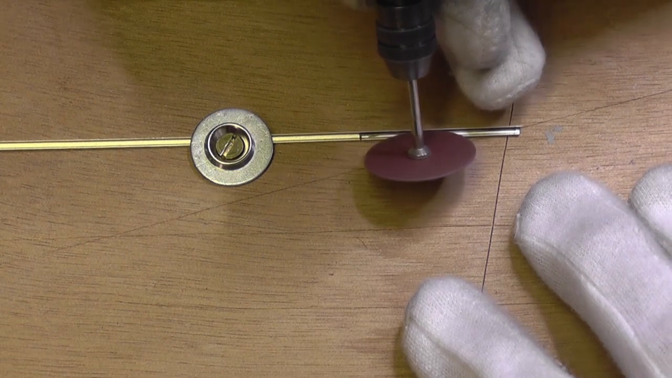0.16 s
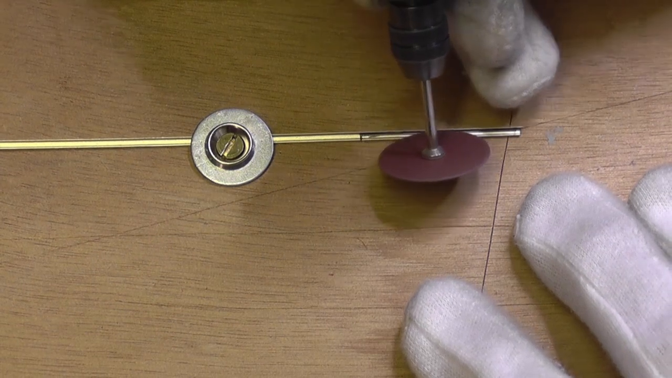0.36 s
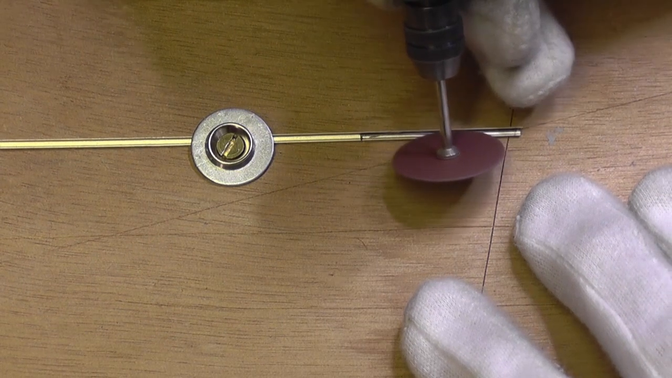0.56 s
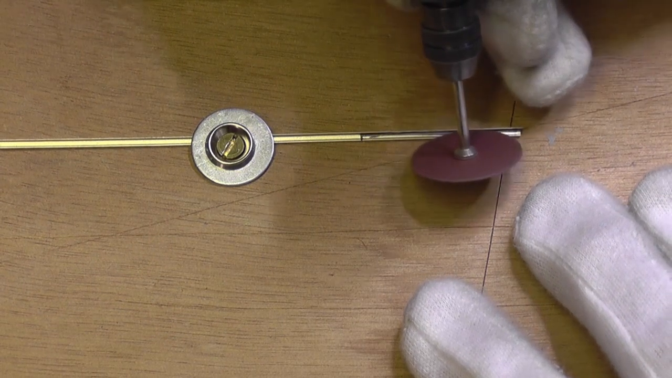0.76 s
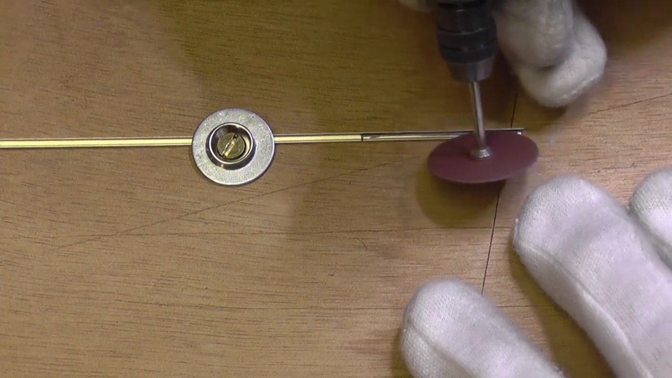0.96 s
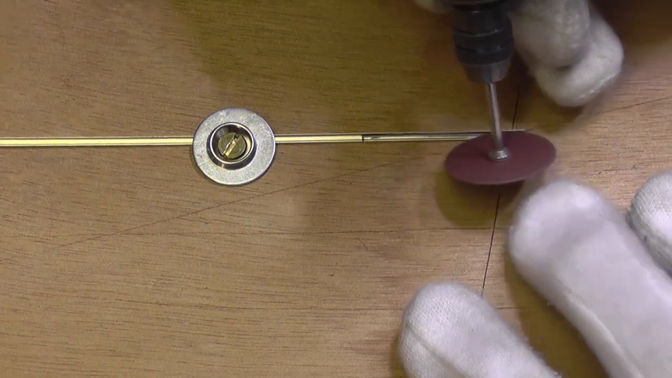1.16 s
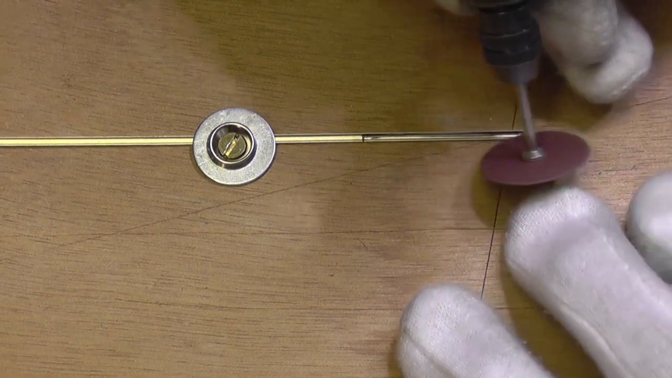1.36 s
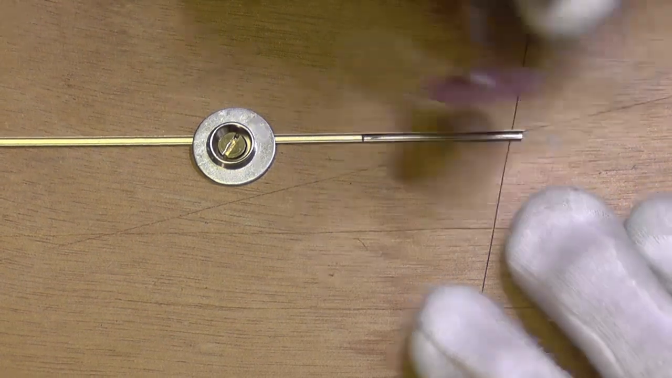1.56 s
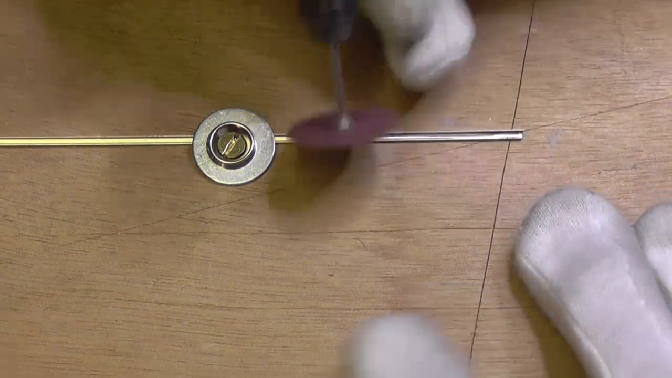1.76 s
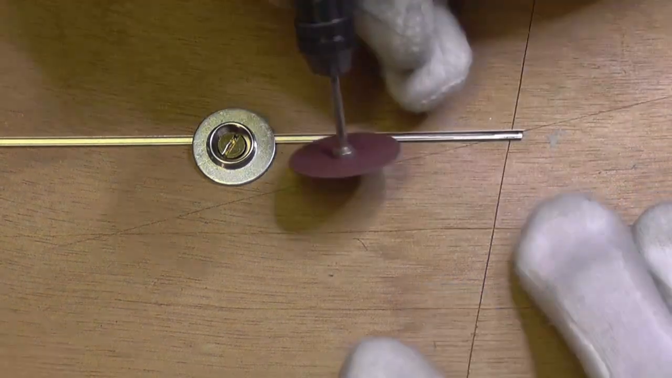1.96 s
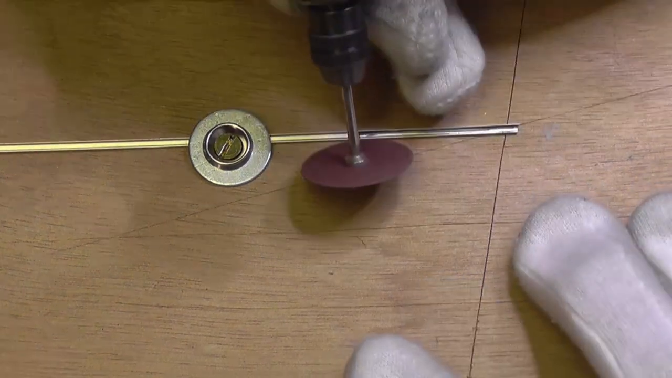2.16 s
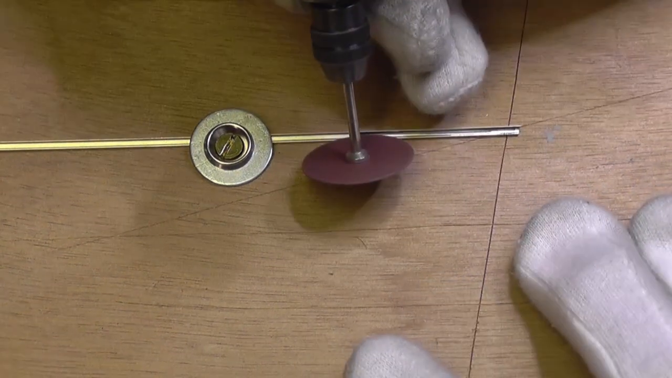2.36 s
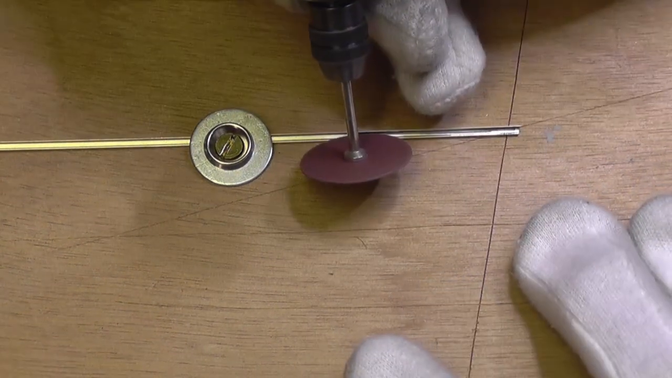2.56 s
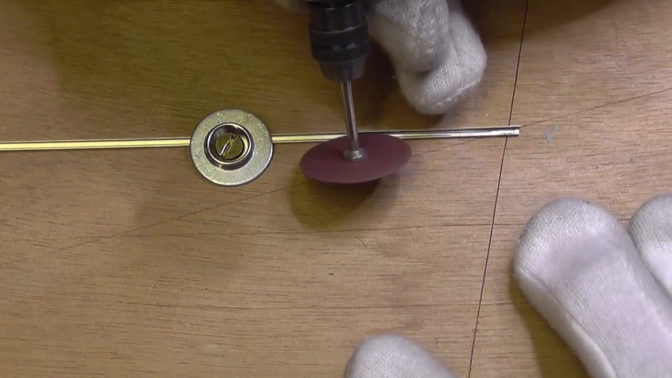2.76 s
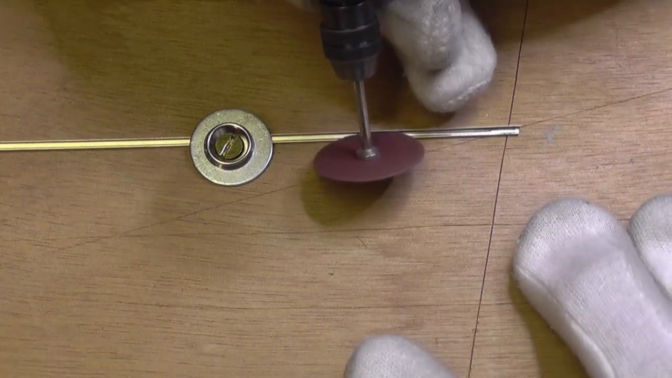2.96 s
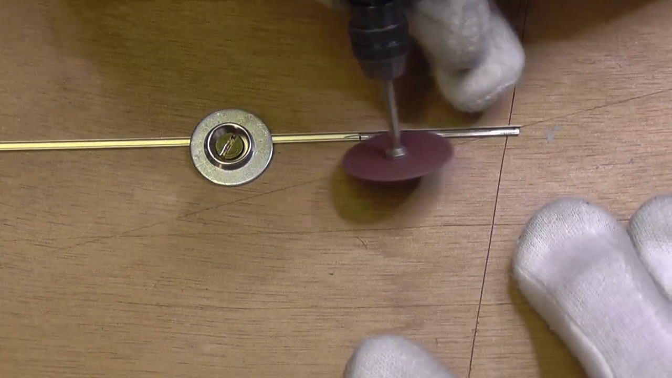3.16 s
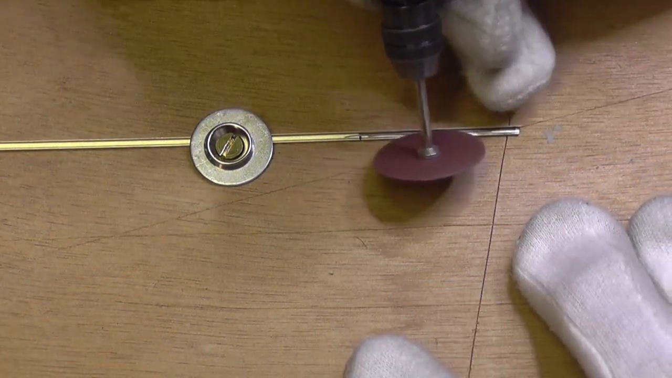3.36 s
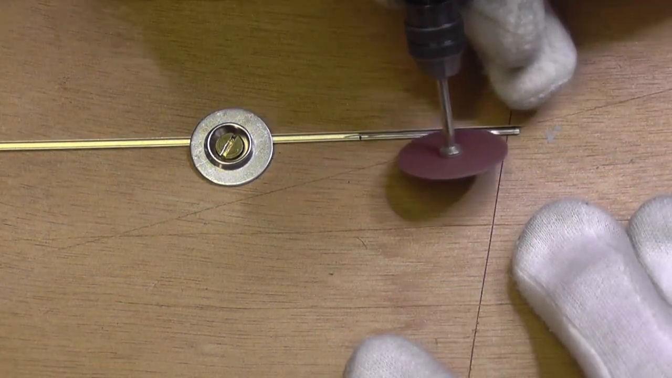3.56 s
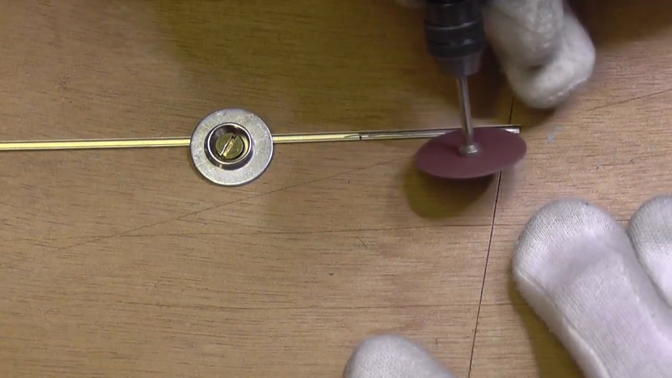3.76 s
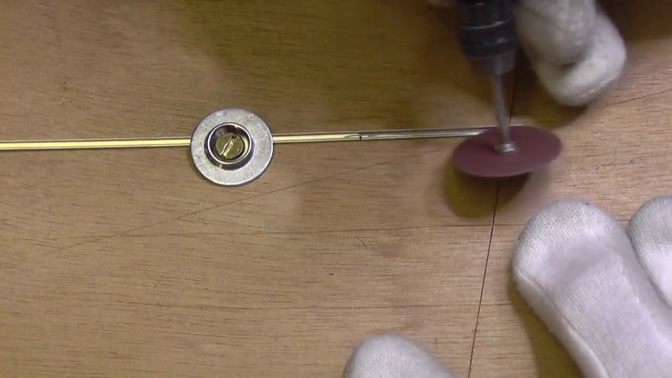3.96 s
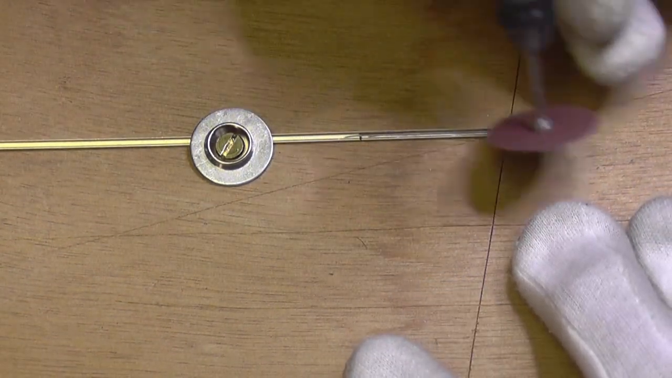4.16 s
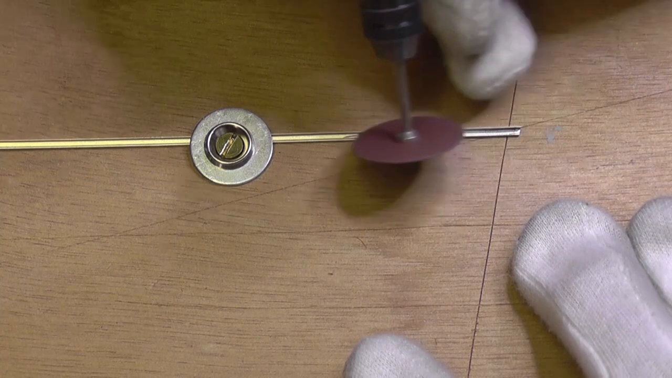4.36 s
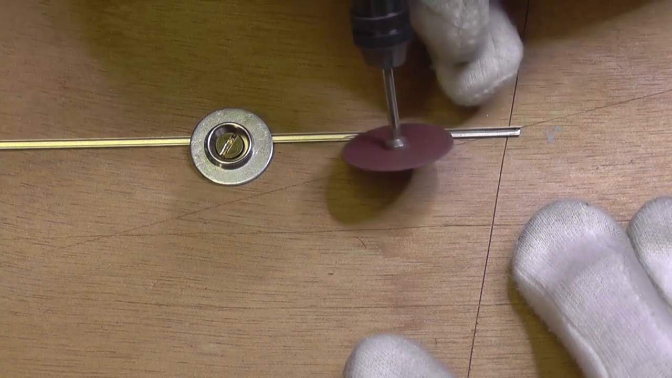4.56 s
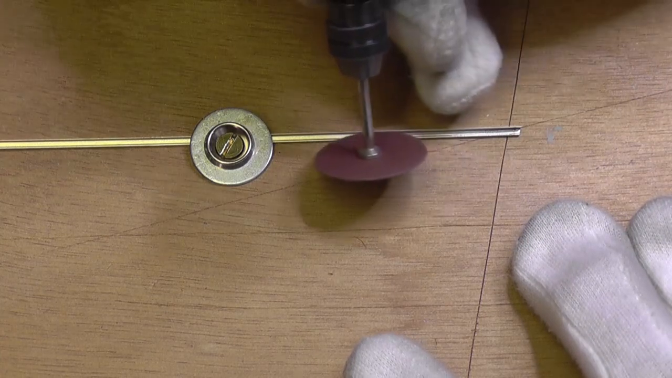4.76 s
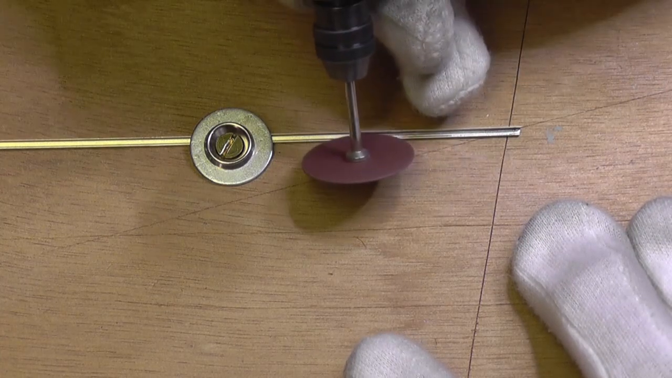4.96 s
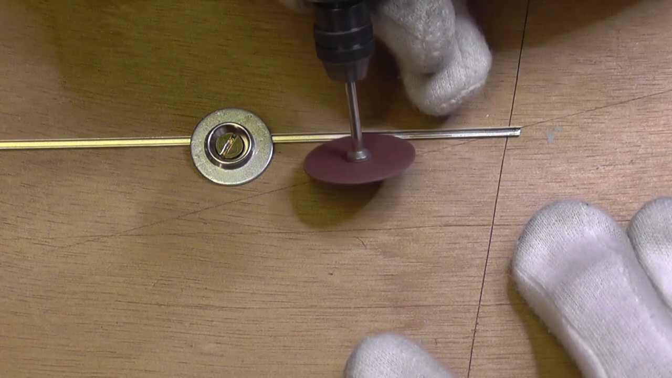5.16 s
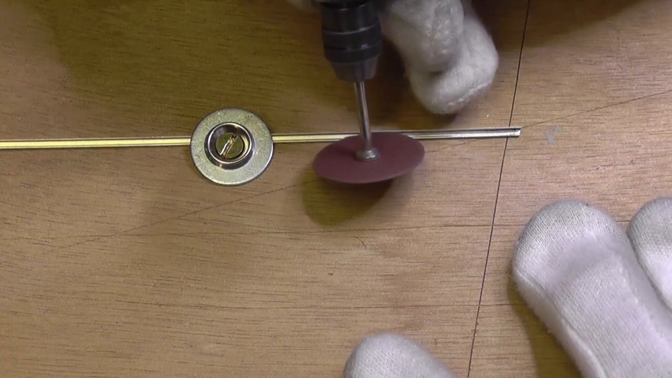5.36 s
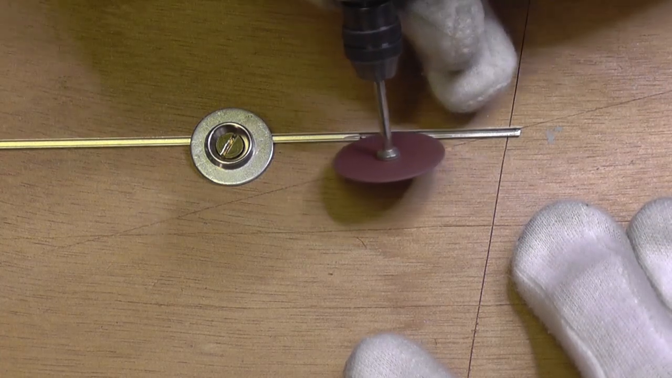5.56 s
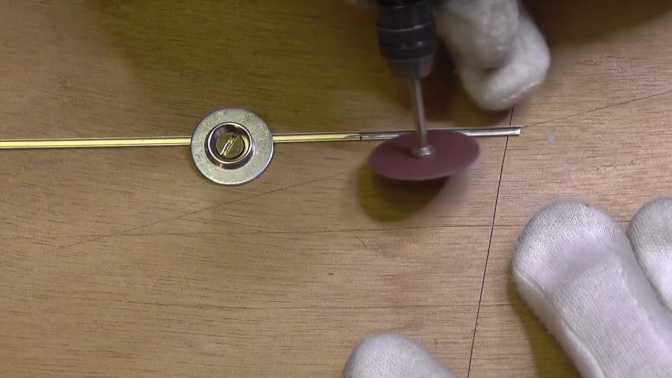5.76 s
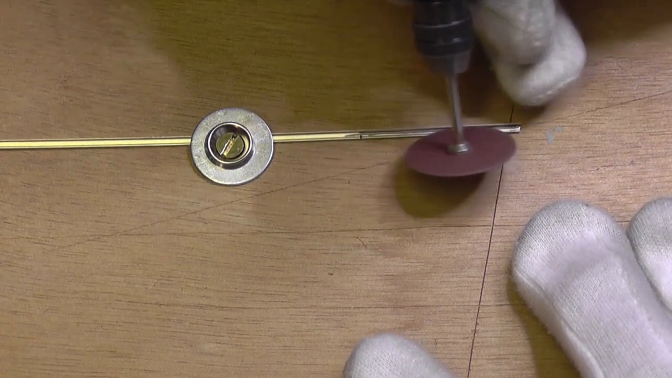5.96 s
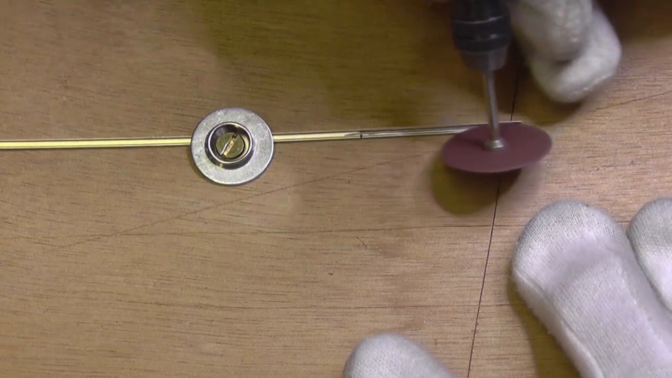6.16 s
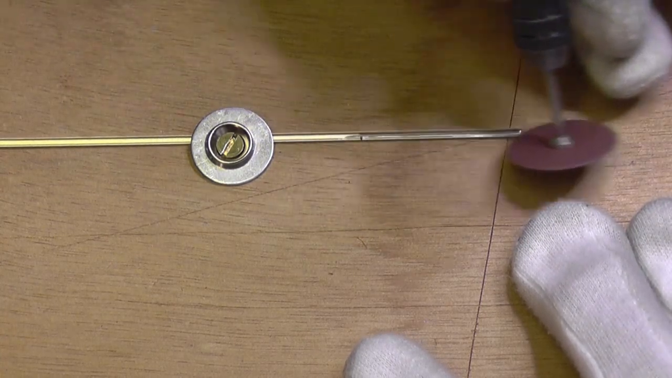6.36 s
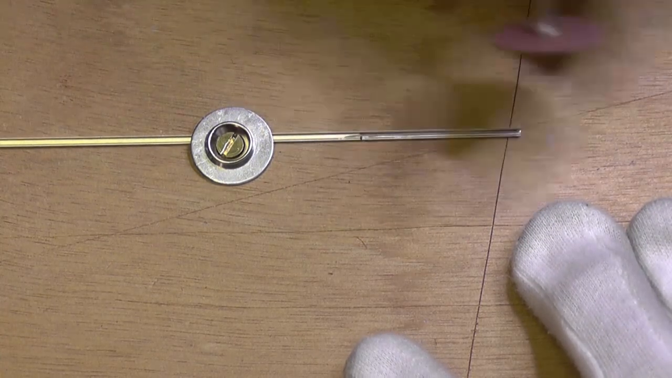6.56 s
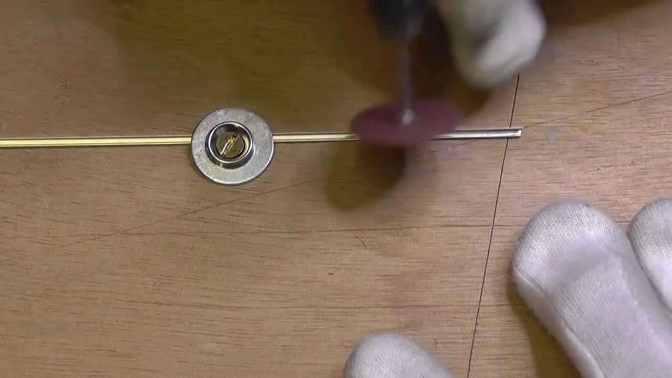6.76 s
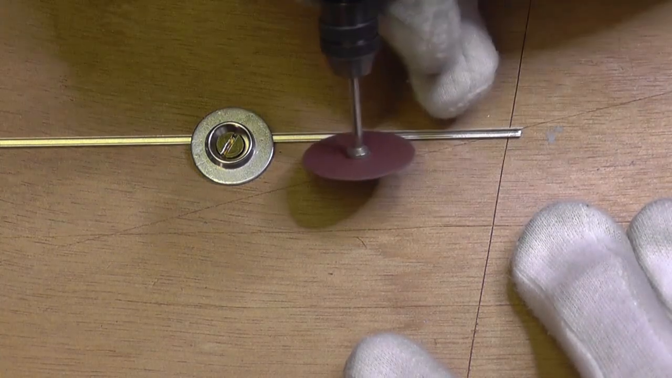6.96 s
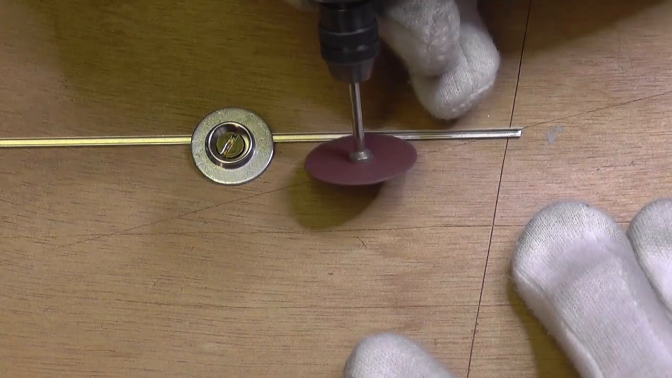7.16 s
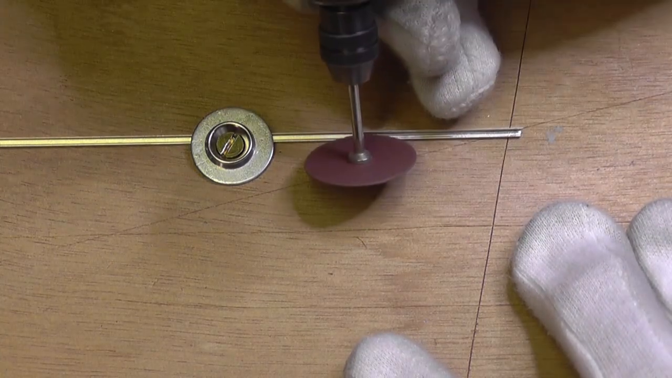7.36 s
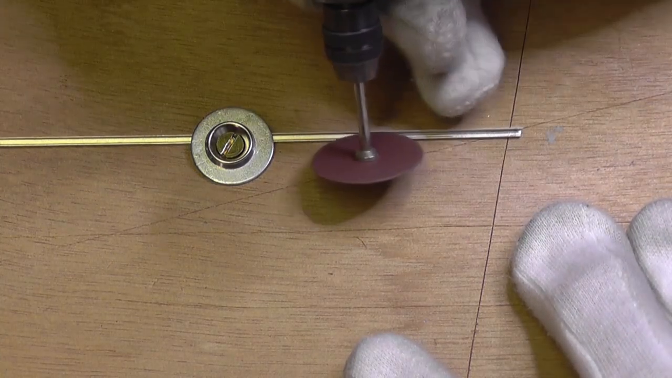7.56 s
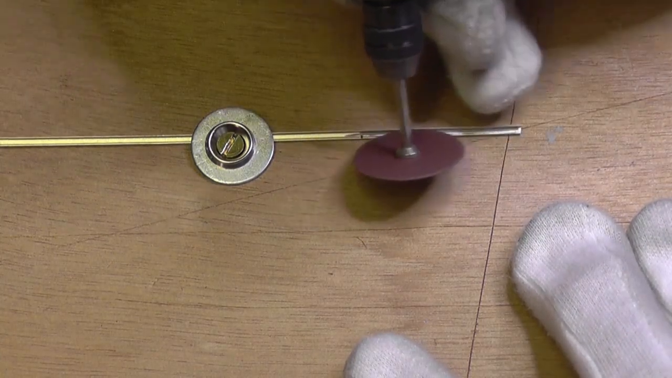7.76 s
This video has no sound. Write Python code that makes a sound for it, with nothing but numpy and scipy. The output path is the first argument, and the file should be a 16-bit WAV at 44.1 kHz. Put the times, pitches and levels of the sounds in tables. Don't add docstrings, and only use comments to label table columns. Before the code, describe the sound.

A small electric rotary tool is heard close up at a wooden bench in a dry workshop. From 0 to 1.4 seconds its disc is already grinding thin metal, a bright gritty rasp with fluttering metallic tones, while a hand rubs and lightly knocks the bench until about 0.7. The disc lifts; the pitch jumps up and the motor whines alone, much quieter, gradually swelling, with soft knocks. At 2.7 a hard, sharp touch-down starts a longer grind, its pitch sinking to a labouring, growling hum around 3.7 before release at 4.1. The free whine returns. A third pass from 5.2 to 6.4 again hisses, rings and bogs down. Whining resumes with a few bench thumps near 6.5. At 7.4 the disc bounces briefly, then bites again at 7.45, slowing and roughening until the cut-off at 7.8.

```python
import sys
import numpy as np
from scipy import signal
from scipy.fft import rfft, irfft
from scipy.io import wavfile
from scipy.ndimage import uniform_filter1d, map_coordinates

SR = 44100
rng = np.random.default_rng(int(sys.argv[2]) if len(sys.argv) > 2 else 0)


def transcribe(signal):
    frames = np.atleast_2d(signal).T
    limited = np.clip(frames, -1, 1)
    pcm = np.round(limited * 32767).astype(np.int16)
    wavfile.write(sys.argv[1], SR, pcm)


def natural_amplitude(level_db):
    exponent = np.asarray(level_db, float) / 20
    return 10 ** exponent


N = 344421

# f/Hz, density/dB per Hz
WORKSHOP = [(15, -47), (25, -13), (167, -10), (194, -19), (233, -6), (295, -6), (700, -13), (910, -42),
            (1540, -120)]
WORKSHOP_DB = -70.5
# f/Hz, level/dB
MAINS = [(100, -67.5), (200, -68), (300, -64.5)]
# t/s, level/dB
RUBBING = [
    (0, -50),
    (.4, -48.5),
    (.62, -57.5),
    (.7, -65),
    (7.81, -65),
]
# t/s, peak level/dB, f/Hz, share in opposite phase at the ports/1
KNOCKS = [(.009, -44, 554, 0.071), (0.073, -55, 263, 1), (.084, -53, 297, .9), (.17, -56, 400, 0.92),
          (0.194, -52, 330, 0.94), (0.297, -58.5, 430, 0.8), (.378, -55, 454, .8), (0.388, -49, 490, 0.75),
          (1.619, -55, 302, -0.18), (1.673, -59, 190, 0), (1.74, -56, 170, 0.018), (1.859, -49, 169, -0.11),
          (2.144, -55, 260, 0.43), (2.656, -42, 480, 0.64), (2.656, -42, 190, 0.46),
          (5.225, -50.5, 398, 0.97), (6.459, -45, 487, -0.11), (6.461, -48.5, 750, 0.0098),
          (6.646, -55.5, 195, -0.14), (6.669, -57, 200, -0.19), (7.382, -49, 293, 1),
          (7.452, -65, 605, 0.56)]

# multiple of shaft speed/1, level/dB
WHINE = [(4, -13), (5, 0), (6, -2), (7, -14), (8, -9), (9, -10), (10, -10), (13, -13.5), (14, -14),
         (15, -5), (17, -13), (19, -14), (20, -17), (22, -16), (23, -10), (25, -13), (26, -14), (27, -16),
         (31, -19), (32, -16), (33, -14), (34, -10), (35, -9), (36, -6), (37, -10), (38, -16), (39, -11),
         (40, -17), (42, -15), (43, -19), (44, -9)]
WHINE_DB, FAINT_DB, TOP_MULTIPLE = -42, -26, 46
COMMUTATOR = (10, 15)
# multiple of shaft speed/1, level/dB
BETWEEN_MULTIPLES = [(5.49, -11), (6.71, -10), (7.7, -16)]
# f/Hz, density/dB per Hz
BRUSHES = [(290, -44), (500, -21), (906, -9), (1030, -2.5), (1480, -10), (1870, -9), (2230, -11),
           (2980, -9.5), (3250, -16.5), (5970, -21), (7310, -22.5), (10500, -33.5), (12700, -35.5),
           (15300, -24.5), (16000, -53)]
BRUSHES_DB = -47
# f/Hz, width/Hz, level/dB
HOUSING = [(1140, 350, 5.5), (2670, 280, -39.5), (7440, 940, 14), (10100, 430, -25), (10320, 1140, 21.5)]
# f/Hz, width/Hz, change/dB
VENT_SHADOWS = [(5950, 400, -9), (2270, 150, -5), (3650, 200, -4), (9450, 300, -4)]

# touch-down t/s, lift t/s, free speed afterwards/turns per s
PASSES = [
    (0, 1.365, 202.7),
    (2.654, 4.08, 205.7),
    (5.225, 6.367, 205.9),
    (7.376, 7.395, 203),
    (7.45, 7.81, 205),
]
# t/s, speed/turns per s
LOADED_SPEED = [
    [(0, 184.6), (.098, 183.9), (.136, 178.6), (.294, 184.5), (.416, 185.2), (.636, 174.3), (.802, 171.2),
     (.908, 179.3), (1.056, 175.1), (1.128, 169.6), (1.196, 170.1), (1.26, 175.2), (1.322, 172.8),
     (1.36, 178)],
    [(2.752, 194.8), (2.792, 184.6), (2.846, 181.4), (3.05, 141.2), (3.094, 143.4), (3.21, 138.7),
     (3.268, 144), (3.442, 117.3), (3.538, 109.4), (3.62, 106.5), (3.694, 96.8), (3.76, 101.5),
     (3.822, 97.5), (3.876, 105.2), (3.948, 110), (4.07, 132)],
    [(5.324, 186.2), (5.382, 186.8), (5.496, 174.6), (5.59, 157.4), (5.626, 153.3), (5.692, 140.3),
     (5.794, 137.3), (5.92, 119.3), (6.022, 112.8), (6.074, 106.7), (6.134, 109.1), (6.222, 102.7),
     (6.244, 103.1), (6.36, 128)],
    [(7.46, 200), (7.56, 183.6), (7.68, 173.5), (7.74, 155.8), (7.81, 144.6)],
]
DROOP = [-.2, 2.2, 1.0]
SPIN_UP_S = .08
JUDDER, IDLE_JUDDER = .6, .15
# t/s, lasting/s, multiple of shaft speed/1, level/dB
SHAKES = [(0.84, 0.42, 1, -60), (3.46, 0.13, 1, -58), (3, 0.051, 1, -62), (3.98, 0.06, 1, -60),
          (5.5, 0.17, 1, -60), (3.05, 0.19, 3, -51), (3.07, 0.14, 5, -52), (5.55, 0.16, 3, -52),
          (7.68, 0.12, 3, -50.5), (.2, 0.2, 4, -62), (3.8, .14, 5, -55), (5.55, .09, 4, -52),
          (5.7, .08, 5, -52), (3.5, .12, 7, -59), (3.72, .15, 9, -56), (6.0, .12, 9, -51),
          (3.5, .12, 11, -46), (5.82, .1, 9, -47), (3.17, .12, 9, -46), (7.7, .1, 5, -52),
          (3.0, .1, 6, -54), (6.15, .1, 8, -55), (3.1, .15, 10, -42), (3.45, .12, 12, -42),
          (3.75, .12, 14, -43), (2.82, .1, 9, -42), (5.65, .12, 10, -43), (6.1, .12, 13, -44)]

# t/s, force as level/dB, flexing of the rail/dB
HAND = [
    [(0.0, -30.5, 2.5), (0.088, -24, -9), (0.95, -22.5, -21), (0.97, -20, -29.5), (1.19, -22.5, -23.5),
     (1.294, -23.5, -27), (1.34, -24, -19.5)],
    [(2.7, -26, -16.5), (2.766, -24, -23), (2.94, -23, -12.5), (3.564, -21.5, -12.5), (3.696, -23, -5.5),
     (4.034, -20.5, -14.5), (4.05, -24.5, -14)],
    [(5.27, -24.5, -20.5), (5.31, -24, -20), (5.334, -24.5, -19.5), (5.892, -22, -9), (6.1, -22.5, -7.5),
     (6.33, -21.5, -13.5), (6.34, -25, -9)],
    [(7.48, -26, -18), (7.492, -31, -0.5), (7.53, -26, -9), (7.572, -25.5, -12.5), (7.74, -23, -9.5),
     (7.81, -20, -14.5)],
]
MEAN_FLEX_DB, MEAN_SPEED = -10, 150
FLUTTER_DB = [1.5, 1.0, 0.5, 0.45, 0.53]
HARDNESS = [
    0.39,
    1.51,
    1.15,
    1.28,
    0.87,
]
TOUCH_S, LANDING_S = .011, .003
SLIP_S = 0.0077
SLIP_DB = [-5, 2.5, 0, -7, 4]
RING_ON_DB_PER_S = 177
BOUNCE_FALL = 1.7

# f/Hz, width/Hz, level/dB
BENCH = [(330, 1020, -4.5), (562, 580, -6), (903, 48, -6), (1150, 74, -30)]
BENDING = [(1334, 43, -6.5), (1440, 62, -5.5), (1681, 99, -4), (2100, 93, -6.5), (2400, 590, -10),
           (2960, 490, -7)]
RINGING = [(3500, 174, -11), (3704, 155, -9), (4228, 173, -3), (4640, 380, -8), (5490, 740, -8),
           (5910, 93, -4), (6290, 620, -12)]
HISS = [(7230, 200, -8), (8930, 1200, 1.5), (9800, 150, 9), (10260, 860, 6), (10400, 410, 6),
        (11120, 320, -1)]
SIZZLE = [(12950, 410, -3.5), (14740, 930, -10), (16000, 1100, 4.5)]
# level over force/dB, share of flexing/1,
# speed effect/dB per turn/s, touch-down/dB, first fall/dB per s, depth of first fall/dB
GROUPS = [
    (-36, 0.52, 0.0577, 25.5, 400, 7),
    (-9.5, 0.74, 0.0917, 6.5, 694, 12.5),
    (-3.5, 0.4, 0.0917, 4.5, 599, 13),
    (-3, -0.058, 0.0116, 11.5, 1500, 49),
]
SIZZLE_LAW = (-11, 0.4, 0.1517, 17.5, 1500, 45)
LABOUR_DB, LABOUR_WANDER_DB = -13.5, 7
EASING_DB = .08
RAIL_LOW_HZ = 1357

# t/s, lasting/s, f/Hz, change/dB
PITCH_CHANGES = [(0.08, 0.07, 12100, 6.5), (1.3, 0.03, 5440, 3), (0.16, 0.16, 5930, 6),
                  (0.23, 0.22, 2170, 7.5), (0.27, 0.16, 1580, 10.5), (0.27, 0.25, 7200, -13),
                  (0.92, 0.083, 4560, 2), (0.37, 0.25, 4180, 2), (0.38, 0.39, 7470, 11),
                  (0.64, 0.38, 2900, 9.5), (0.55, 0.078, 2930, 5), (1.1, 0.13, 5870, 7.5),
                  (1.05, 0.17, 5430, 9.5), (1.28, 0.033, 5430, 9.5), (.55, 0.5, 5950, 5),
                  (1.16, 0.09, 2050, 8), (1.16, 0.13, 5180, 8), (1.2, 0.12, 11600, 6.5), (1.29, 0.25, 3500, 4),
                  (2.75, 0.045, 1850, 16.5), (2.77, 0.053, 7500, 6), (2.77, 0.078, 15400, 8),
                  (2.79, 0.068, 4700, 5.5), (2.83, 0.078, 3540, 6.5), (3.0, 0.085, 3850, 5),
                  (3.0, 0.32, 14400, 8), (3.15, 0.15, 5500, 0.5), (3.32, 0.57, 6140, 10.5),
                  (3.5, 0.14, 3020, 8.5), (3.51, 0.16, 10160, 6.5), (3.72, 0.19, 2395, 14.5),
                  (3.83, 0.1, 2060, 12), (3.88, 0.11, 9000, 3.5), (3.99, 0.18, 1780, 14),
                  (5.34, 0.23, 4420, 5), (5.41, 0.38, 13700, 7), (5.33, .06, 6300, 3), (5.86, 0.39, 5300, 8.5),
                  (5.91, 0.15, 1980, 4), (2.8, 0.1, 2830, 6), (5.96, 0.11, 2280, 14.5), (6.05, 0.64, 9130, 6),
                  (6.13, 0.16, 3550, 7), (6.29, 0.089, 1510, 14), (7.55, 0.11, 12900, 4.5),
                  (7.52, 0.039, 3730, 10.5), (7.66, 0.07, 1425, 8.5), (7.62, 0.055, 1570, 9.5),
                  (7.62, 0.11, 7500, 6), (7.64, 0.052, 5440, 7),
                  (0.99, 0.065, 3930, -8), (0.09, 0.17, 2950, 7), (0.1, 0.082, 10300, -4.5),
                  (0.19, 0.15, 4660, -18), (0.22, 0.17, 2970, -21), (0.26, 0.11, 5630, -8),
                  (0.32, 0.13, 5120, -11), (0.33, 0.14, 2390, -1), (0.55, 0.2, 6470, -11),
                  (0.84, 0.55, 3780, -2), (1.07, 0.12, 6370, -6), (1.09, 0.22, 8570, -15),
                  (2.8, 0.22, 5640, -18), (2.85, 0.17, 8600, -4), (3.19, 0.13, 3500, -15),
                  (3.22, 0.063, 1830, -19), (3.33, 0.11, 2050, -8), (3.53, 0.1, 3550, -6),
                  (3.72, 0.23, 3920, 2), (3.76, 0.22, 1570, -5), (3.87, 0.21, 7700, -4),
                  (3.95, 0.092, 2870, -11), (5.47, 0.068, 5550, -8), (5.85, 0.14, 2760, -24),
                  (6.13, 0.27, 6050, -4), (6.16, 0.13, 4320, -19), (7.59, 0.12, 2400, -7),
                  (7.61, 0.095, 10100, -6), (7.64, 0.29, 6050, -12), (7.67, 0.14, 4600, -21),
                  (2.77, 0.076, 3360, -14), (5.5, 0.041, 3200, -8), (3.25, .06, 3260, -6),
                  (7.66, 0.049, 3330, -8), (5.67, 0.03, 1900, -4),
                  (2.67, 0.06, 4460, 8), (5.24, 0.049, 4300, 2.5), (7.38, 0.04, 4600, 5),
                   (2.66, 0.027, 9600, -16), (5.23, .03, 8600, -10), (7.38, 0.032, 8600, -13),
                   (2.7, 0.098, 2600, 0), (5.31, 0.063, 3300, -16), (8.2, 0.041, 3220, -6),
                   (.1, 0.25, 3600, -6.5), (3.2, 0.29, 4200, -6), (3.83, 0.21, 4170, -5),
                   (5.6, 0.2, 4200, -2.5), (1.17, 0.11, 4200, -12), (2.8, 0.067, 1640, 8),
                   (2.8, 0.041, 1420, 6), (3.06, 0.083, 1700, 6.5), (5.75, 0.043, 1670, 5),
                   (0.08, 0.14, 2860, -4), (1.36, 0.05, 3600, 6.5), (4.1, .06, 3550, 13.5),
                   (14, 0.067, 3500, 0), (0.94, .15, 4500, 6), (3.9, 0.083, 4250, -0.5),
                   (7.465, 0.035, 5500, 12.5), (7.6, 0.12, 3700, 6.5), (7.58, .09, 5600, -4),
                   (7.8, .04, 5400, 5), (7.47, .03, 4700, 2), (2.72, 0.084, 3750, 9), (2.72, .07, 4400, 1),
                   (6.3, 0.055, 3700, 6), (4.6, .06, 890, 13), (7.385, 0.016, 5300, 6),
                  (0.37, 0.063, 2000, 4), (3.32, 0.15, 2450, 6), (6.07, 0.23, 1840, 8.5), (6.16, 0.22, 3180, 8),
                 (1.34, 0.067, 1420, 9), (5.7, 0.19, 1420, 7), (6.13, 0.068, 1420, -21), (5.6, 0.34, 2380, 3),
                 (2.8, 0.064, 2000, -8), (6.8, 0.097, 4040, 9), (0.83, 0.079, 1510, 7.5), (3.9, .12, 4500, 2.5),
                 (5.46, 0.16, 2920, 6.5), (0.54, 0.097, 3500, 4), (7.47, .03, 10500, 6.5)]
CHANGE_SHARPNESS = 22
# f/Hz, width/Hz, change/dB
CANCELLED = [(1850, 90, -6), (2270, 80, -5), (3220, 150, -10), (7100, 300, -8), (8100, 200, -5),
             (9350, 200, -3), (13850, 450, -12)]

# t/s, left minus right level/dB
PLACE = [(0.0, -0.5), (2.17, -0.5), (2.83, -0.5), (3.57, -2.5), (3.83, -1.5), (4.0, -1.5), (4.07, -1),
         (5.2, -1), (6.26, -2.5), (6.37, -1), (7.61, -1), (7.81, -2.5)]
# f/Hz, left minus right level/dB
LEAN = [(60, -40), (130, 5.5), (290, -4), (640, 0), (1410, 0), (3100, 2), (6820, 0), (15000, -3)]
# f/Hz, level/dB
WIDTH = [(60, -4), (400, -18), (1000, -9), (2000, -19), (4300, -20.5), (5800, -8), (7000, -12), (8000, -8),
         (9000, -11), (15000, -9)]
ROOM_T60_S, ROOM_DB = .13, -17
DUCKED_DB, DUCK_S, RECOVER_DB_PER_S, FULL_DB = -19, 0.018, 16.5, -2.4
TOP_HZ = 15850


def rms_one(x):
    return x / np.sqrt(np.mean(x ** 2) + 1e-20)


def in_time(rows):
    s, *columns = np.transpose(rows)
    return [np.interp(np.arange(N) / SR, s, c) for c in columns]


def at_hz(points, hz):
    table_hz, db = np.array(points).T
    return np.interp(np.log(hz + 1), np.log(table_hz), db)


def drift(rate):
    r = np.exp(-80 * np.pi * rate / SR)
    slow = signal.lfilter([1], [1, -2 * r, r * r], rng.standard_normal(N // 40 + 2002))[2000:]
    return np.interp(np.arange(N) / 40, np.arange(len(slow)), rms_one(slow))


def resonate(x, hz, width_hz):
    r = np.exp(-np.pi * width_hz / SR)
    zeros = np.array([1, 0, -1]) * (1 - r * r) / 2
    return signal.lfilter(zeros, [1, -2 * r * np.cos(2 * np.pi * hz / SR), r * r], x)


def highpass(x, hz):
    return signal.sosfilt(signal.butter(4, hz, "high", fs=SR, output="sos"), x)


def coloured(spectrum, x=None):
    hz = np.fft.rfftfreq(N, 1 / SR)
    x = rng.standard_normal(N) if x is None else x
    return rms_one(irfft(rfft(x) * natural_amplitude(at_hz(spectrum, hz)), N))


def repeating(turns, memory):
    keep = np.clip(memory, 0, .995)
    fresh = rng.standard_normal((1600, 300))
    rim = signal.lfilter([np.sqrt(1 - keep ** 2)], [1, -keep], fresh, axis=0)
    return rms_one(map_coordinates(rim.ravel(), [turns * 300 + 6000], order=1))


def stand():
    return natural_amplitude(-70.5 + 3.1 * drift(2.2)) * coloured([(20, -13), (120, 0.5), (400, -2.5), (800, -13)])


def workshop():
    t = np.arange(N) / SR
    hum = sum(natural_amplitude(db) * np.sin(2 * np.pi * hz * t) for hz, db in MAINS)
    return natural_amplitude(WORKSHOP_DB) * (coloured(WORKSHOP) + 1.3 * coloured(WORKSHOP) * [[1], [-1]]) + hum


def rubbing():
    low = coloured([(20, -26), (150, -26), (500, -31), (900, -28.5)]) * natural_amplitude(7.3 * drift(24))
    return natural_amplitude(in_time(RUBBING)[0]) * low * [[1], [-1]]


def knocks():
    out = np.zeros((2, N))
    t = np.arange(4000) / SR
    for s, db, hz, opposite in KNOCKS:
        ring = np.sin(2 * np.pi * hz * t) * natural_amplitude(-60 * t / .05)
        push = 1.8 * opposite * np.exp(-t / .0025)
        knock = natural_amplitude(db) * (ring + push) * (1 - np.exp(-t / 0.000093))
        at = round(s * SR)
        out[:, at:at + len(t)] += knock * [[1 + opposite], [1 - opposite]]
    return out


def shaft():
    t = np.arange(N) / SR
    long_passes = [p for p in PASSES if p[1] - p[0] > .1]
    rows = [(p[0], q[2] - droop) for p, q, droop in zip(long_passes[1:], long_passes, DROOP)]
    rows += [tuple(row) for table in LOADED_SPEED for row in table]
    speed = in_time(sorted(rows))[0]
    judder = drift(14)
    speed += JUDDER * judder
    for table, (touch, lift, free), (again, *_), droop in zip(LOADED_SPEED, long_passes, long_passes[1:], DROOP):
        s, last = table[-1]
        idle = (t > s) & (t < again)
        since = t[idle] - s
        speed[idle] = free - (free - last) * np.exp(-since / SPIN_UP_S) + IDLE_JUDDER * judder[idle]
        speed[idle] -= droop * (since / (again - s)) ** 3
    return speed


def motor_whine(turns, speed, ripple):
    shaken = turns + 0.0012 * drift(30) + 0.0032 * ripple
    strong = dict(WHINE)
    lines = [(k, strong.get(k, FAINT_DB)) for k in range(1, TOP_MULTIPLE + 1)] + BETWEEN_MULTIPLES
    start = rng.random(len(lines))
    flutter = [natural_amplitude(1.3 * drift(14)) for k in range(6)]
    coarse = speed[::100]
    singing_db = np.clip(.8 * (190 - coarse), 0, 30)
    slowed_db = np.clip(.5 * (201 - coarse), 0, 20)
    whine = np.zeros(N)
    for k, (multiple, db) in enumerate(lines):
        slid_db = at_hz(BRUSHES, multiple * coarse) - at_hz(BRUSHES, multiple * 205)
        change_db = -singing_db if multiple in COMMUTATOR else np.minimum(slid_db, 0) - slowed_db
        level = np.repeat(natural_amplitude(db + change_db), 100)[:N]
        whine += level * flutter[k % 6] * np.sin(2 * np.pi * (multiple * shaken + start[k]))
    return natural_amplitude(WHINE_DB) * rms_one(whine) * (1 + 0.017 * ripple)


def brush_noise(turns, ripple):
    pulsing = (1 + 0.077 * np.cos(2 * np.pi * turns)) * (1 + 0.023 * ripple)
    fine = highpass(repeating(turns, memory=.97), 3300)
    scrape = .6 * rng.standard_normal(N) + .55 * fine * (1 + .3 * ripple)
    brushes = pulsing * coloured(BRUSHES, scrape)
    brushes = brushes + sum(natural_amplitude(db) * resonate(brushes, hz, width) for hz, width, db in HOUSING)
    return natural_amplitude(BRUSHES_DB - 1.0) * brushes


def motor(turns, speed):
    ripple = np.cos(2 * np.pi * 100 * np.arange(N) / SR)
    sound = motor_whine(turns, speed, ripple) + brush_noise(turns, ripple)
    for hz, width, db in VENT_SHADOWS:
        sound = sound + (natural_amplitude(db) - 1) * resonate(sound, hz, width)
    return sound


def shakes(turns):
    t = np.arange(N) / SR
    lines = sum(natural_amplitude(db) * np.exp(-((t - s) / lasting) ** 4) * np.sin(2 * np.pi * round(multiple) * turns)
                for s, lasting, multiple, db in SHAKES)
    return natural_amplitude(-5 + 2.5 * drift(9)) * lines


def labour(turns, speed):
    gaining = np.maximum(uniform_filter1d(np.gradient(speed) * SR, size=4000), 0)
    hum = np.zeros(N)
    for k in range(4, 12):
        swell = natural_amplitude(LABOUR_DB + LABOUR_WANDER_DB * drift(1.3))
        hum += swell * np.sin(2 * np.pi * (k * turns + rng.random()))
    return natural_amplitude(-EASING_DB * gaining) * hum


def contact(speed):
    levels, t = np.zeros((5, N)), np.arange(N) / SR
    force_db, flex_db = in_time(np.concatenate(HAND))
    for k, (db, flex_share, db_per_speed, touch_db, fall_db, knee_db) in enumerate(GROUPS + [SIZZLE_LAW]):
        held_db = force_db + db + flex_share * (flex_db - MEAN_FLEX_DB)
        held_db = held_db + db_per_speed * (speed - MEAN_SPEED) + FLUTTER_DB[k] * drift(1.3)
        for (touch, lift, free), hard in zip(PASSES, HARDNESS):
            on = slice(round(touch * SR), round((lift + .25) * SR))
            since, after = t[on] - touch, np.maximum(t[on] - lift, 0)
            held = np.minimum(np.arange(N)[on], round(lift * SR) - 1)
            jolt_db = touch_db * hard * np.exp(-since / TOUCH_S)
            slip_db = SLIP_DB[k] * (since > .1) * np.exp(-((t[on] - lift) / SLIP_S) ** 2)
            first_fall_db = np.minimum(fall_db * after, knee_db) * (BOUNCE_FALL if lift - touch < .1 else 1)
            fallen_db = first_fall_db + RING_ON_DB_PER_S * after
            levels[k, on] = natural_amplitude(held_db[held] + jolt_db + slip_db - fallen_db)
            levels[k, on] *= 1 - (touch > 0) * np.exp(-since / LANDING_S)
    return levels


def disc_bite(turns):
    bite_db, t = np.zeros(N), np.arange(N) / SR
    for first, last, free in PASSES:
        on = slice(round(first * SR), round((last + .15) * SR))
        depth_db = 2.2 + 3.5 * (first > 0) * np.exp(-(t[on] - first) / .03)
        bite_db[on] = depth_db * np.cos(2 * np.pi * (turns[on] - turns[on][0] - .4))
    return natural_amplitude(bite_db + 0.55 * np.cos(4 * np.pi * turns + 1.0) + 0.29 * drift(27))


def body(rim, grit, modes, repeat, wander_db):
    share = np.clip(repeat, 0, 1)
    force = np.sqrt(share) * rim + np.sqrt(1 - share) * grit
    sound = np.zeros(N)
    for k, (hz, width, db) in enumerate(modes):
        waver = natural_amplitude(db + wander_db * drift(3.4))
        sound += (-1) ** k * waver * resonate(force[k % 2], hz, width)
    return sound / np.sqrt(uniform_filter1d(sound ** 2, size=5000) + 1e-12)


def pitch_changes(rail):
    t, out = np.arange(N) / SR, rail.copy()
    for s, lasting, hz, db in PITCH_CHANGES:
        near = slice(max(0, round((s - 2 * lasting) * SR)), round((s + 2 * lasting) * SR))
        bump = np.exp(-((t[near] - s) / lasting) ** 2)
        width = hz / CHANGE_SHARPNESS * (1 if db > 0 else 2)
        out[near] += (natural_amplitude(db * bump) - 1) * resonate(out[near], hz, width)
    for hz, width, db in CANCELLED:
        out += (natural_amplitude(db) - 1) * resonate(out, hz, width)
    return out


def grinding(turns, speed):
    levels, bite = contact(speed), disc_bite(turns)
    grit = bite * rng.standard_normal((2, N))
    grit = rms_one(grit * natural_amplitude(0.36 * np.minimum(rng.exponential(1, N), 4.0)))
    rim = rms_one(bite * repeating(turns, memory=.935))
    bench = body(rim, grit, BENCH, repeat=.88, wander_db=2.0)
    bending = body(rim, grit, BENDING, repeat=.8, wander_db=1.2)
    ringing = body(rim, grit, RINGING, repeat=0.42, wander_db=1.2)
    hiss = body(rim, grit, HISS, repeat=0.3, wander_db=1.5)
    sizzle = body(rim, grit, SIZZLE, repeat=0.26, wander_db=1.5)
    rail = levels[1] * bending + levels[2] * ringing + levels[3] * hiss + levels[4] * sizzle
    rail = highpass(pitch_changes(natural_amplitude(-1.48) * rail), RAIL_LOW_HZ)
    return rail + natural_amplitude(1.5) * levels[0] * (bench + labour(turns, speed))


def room(x):
    t = np.arange(SR // 3) / SR
    tails = rng.standard_normal((2, len(t))) * natural_amplitude(-60 * t / ROOM_T60_S) * (t > .0015)
    return signal.fftconvolve(x[None], tails / np.sqrt(np.sum(tails ** 2) / 2), axes=1)[:, :N]


def ports(x):
    hz = np.fft.rfftfreq(N, 1 / SR)
    shared, unequal = rfft(room(x))
    tilt = natural_amplitude(at_hz(LEAN, hz) / 2)
    both = (rfft(x) + natural_amplitude(ROOM_DB) * shared) * [tilt, 1 / tilt]
    return irfft(both + natural_amplitude(at_hz(WIDTH, hz)) * unequal * [[1], [-1]], N)


def recorder_gain():
    gain_db, t = np.full(N, DUCKED_DB * 1.), np.arange(N) / SR
    for touch, lift, free in PASSES:
        a, b = round(touch * SR), round(lift * SR)
        gain_db[a:] = DUCKED_DB + (gain_db[a] - DUCKED_DB) * np.exp(-(t[a:] - touch) / DUCK_S)
        gain_db[b:] = np.minimum(gain_db[b - 1] + RECOVER_DB_PER_S * (t[b:] - lift), FULL_DB)
    return natural_amplitude(gain_db)


def scene():
    speed = shaft()
    turns = np.cumsum(speed) / SR
    gain = recorder_gain()
    tool = grinding(turns, speed) + gain * motor(turns, speed) + shakes(turns)
    place = in_time(PLACE)[0]
    pan = natural_amplitude((place - place.mean()) / 2 * [[1], [-1]])
    return ports(tool) * pan + knocks() + rubbing() + stand() + gain * workshop()


def band_limit(x):
    return signal.sosfilt(signal.butter(12, 16870, fs=SR, output="sos"), x)


def record(dry):
    cut = signal.sosfilt(signal.cheby2(16, 60, TOP_HZ + 80, fs=SR, output="sos"), dry)
    return band_limit(cut)


dry = scene()
out = record(dry)
transcribe(out)
```